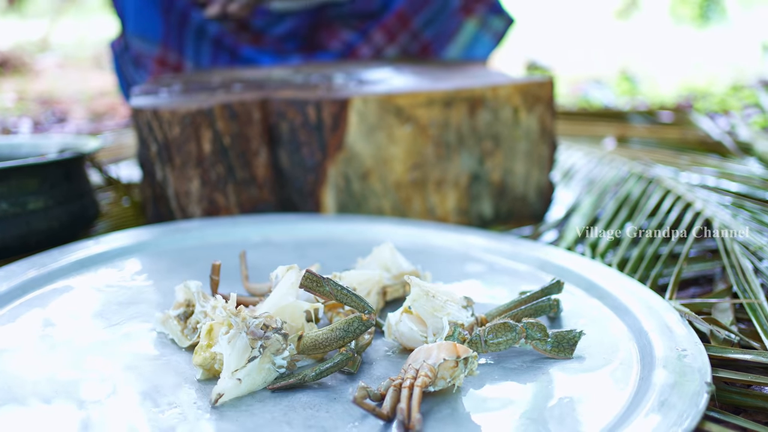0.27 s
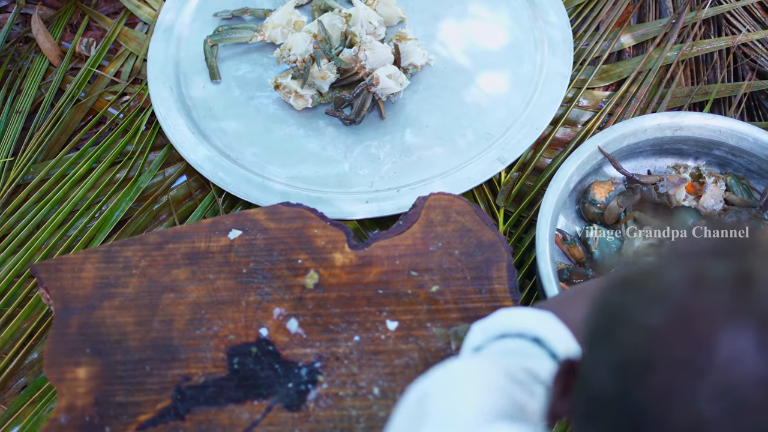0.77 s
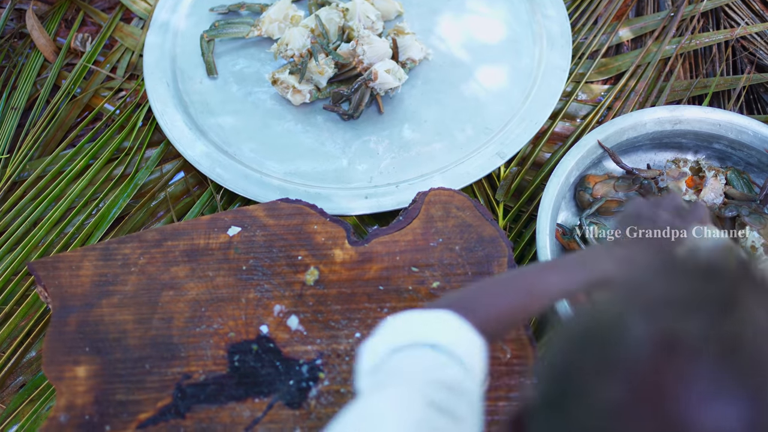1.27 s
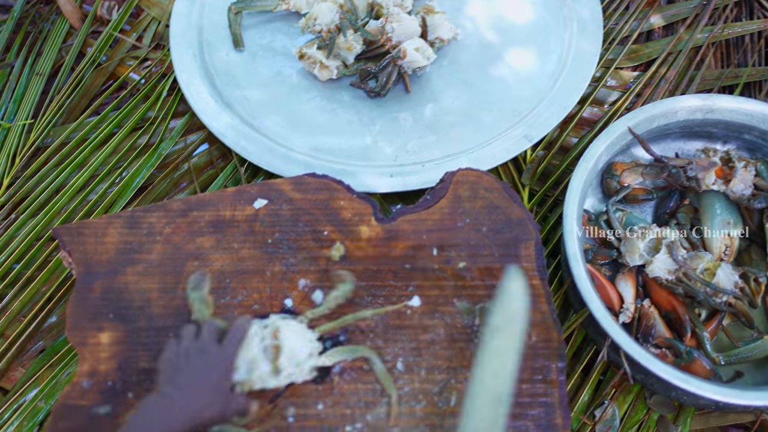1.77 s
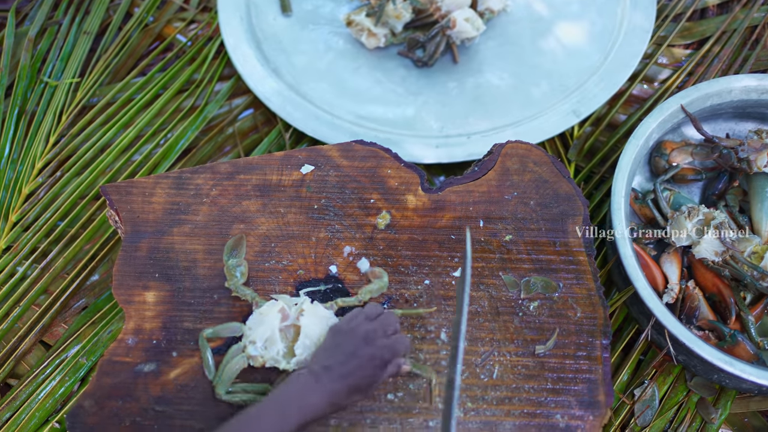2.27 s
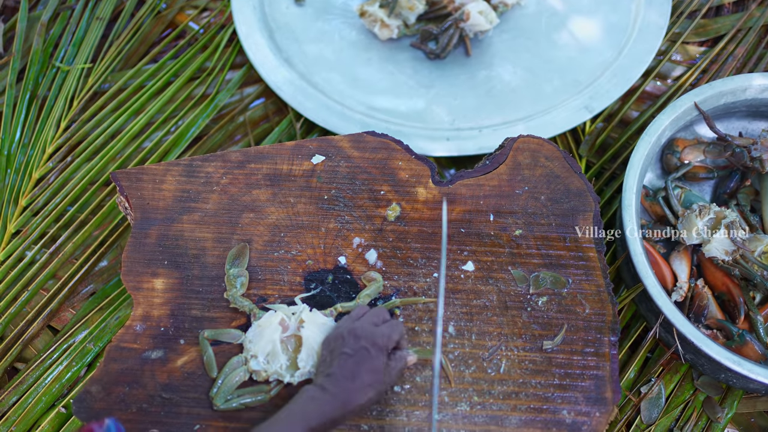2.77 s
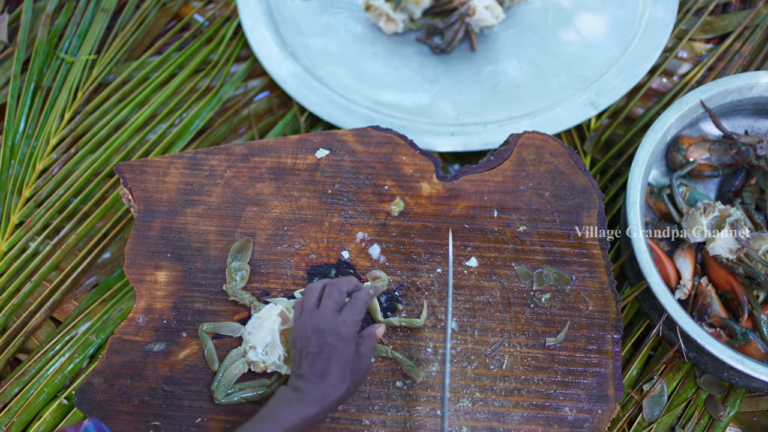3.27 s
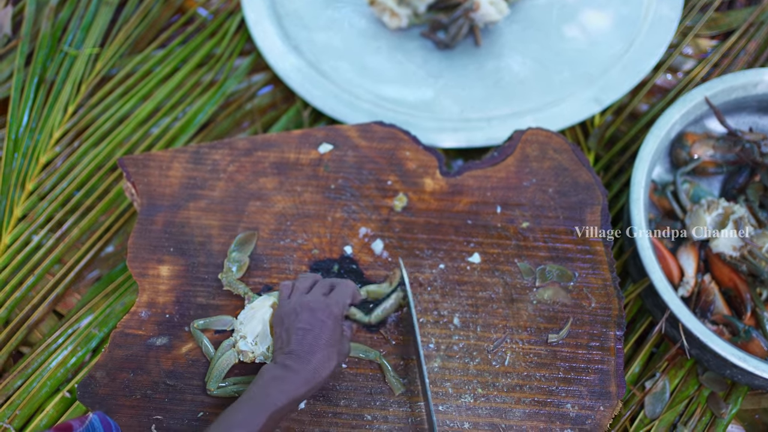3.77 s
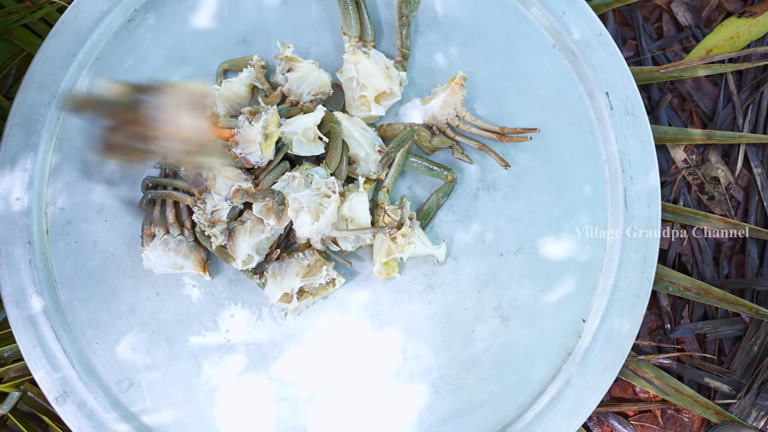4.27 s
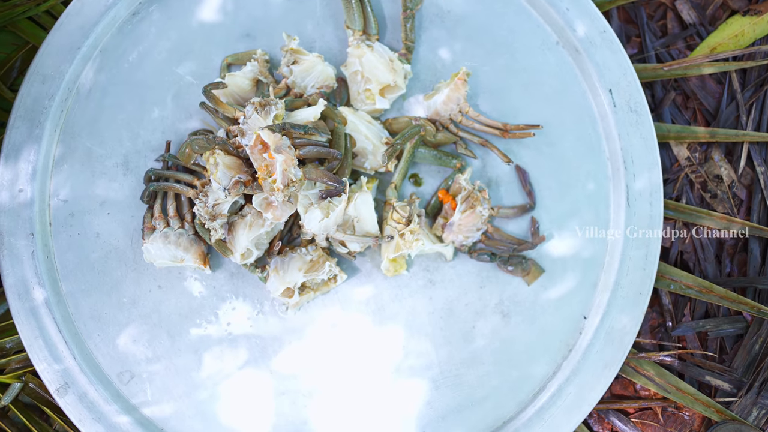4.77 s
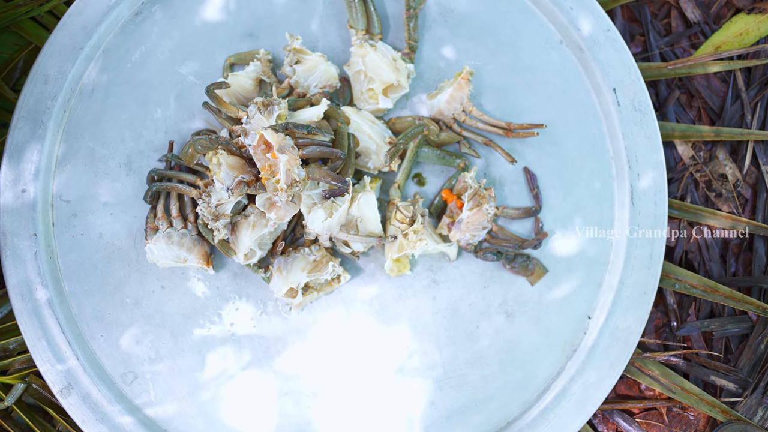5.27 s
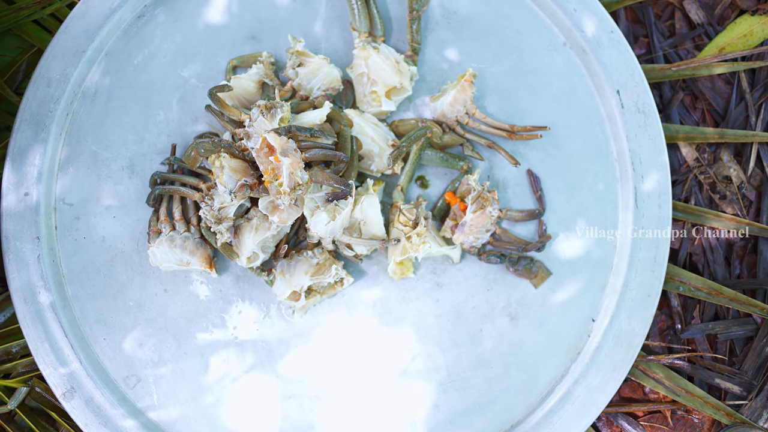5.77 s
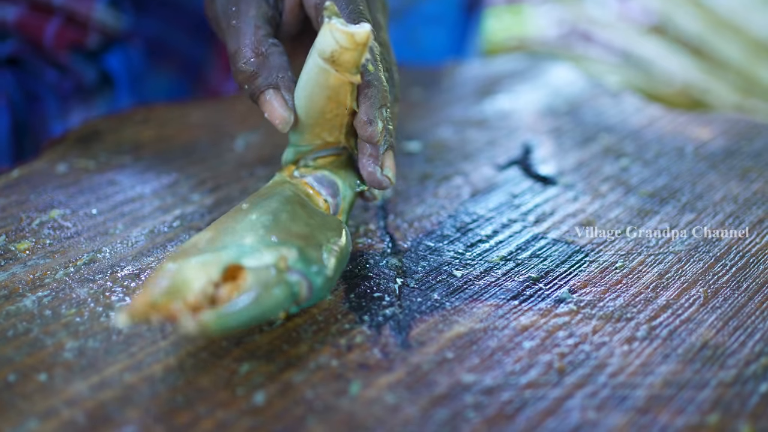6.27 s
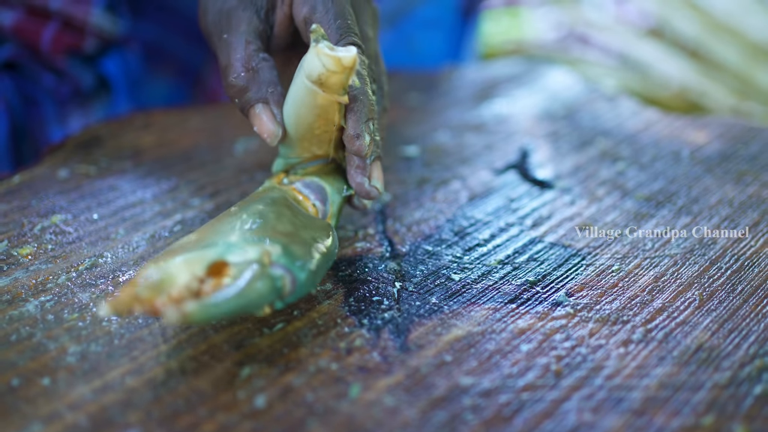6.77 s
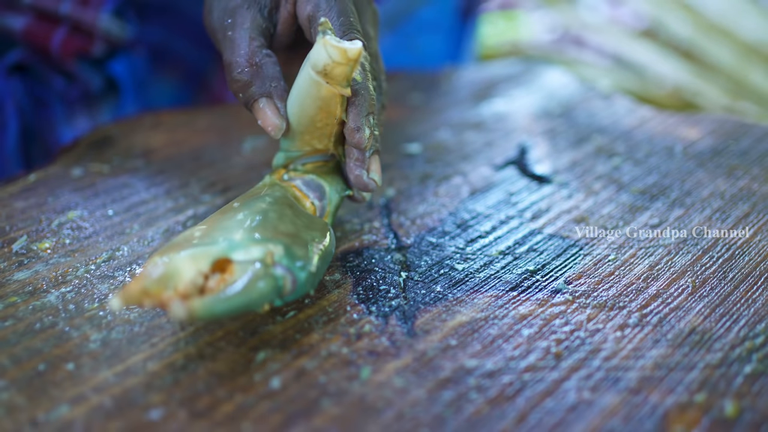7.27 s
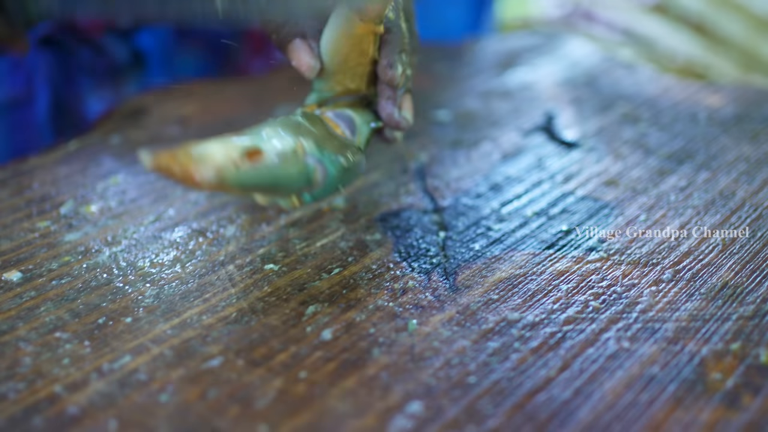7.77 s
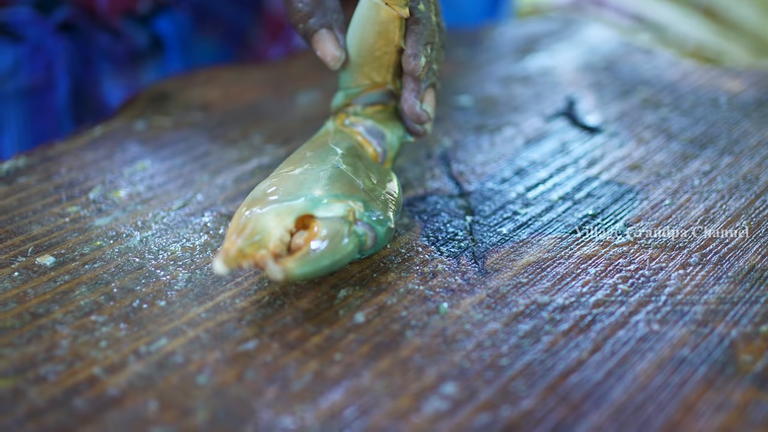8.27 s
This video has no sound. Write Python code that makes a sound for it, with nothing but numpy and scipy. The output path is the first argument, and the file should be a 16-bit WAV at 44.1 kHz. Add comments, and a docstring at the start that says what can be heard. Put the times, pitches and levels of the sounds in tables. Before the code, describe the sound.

Outdoors, wet crab shells crunch and clack, a cleaver chops into a wooden block, pieces clatter onto a tray, and wind buffets the microphone.

```python
"""Chopping crabs outdoors

A cook picks crabs from a metal bowl, chops them on a tree-stump block and tosses pieces onto a tray.
Struck things are damped tones with noise bursts, crunches are swarms of tiny cracks, glugs are sliding tones.
Each blow returns as a hiss from the palms around; filtered noise makes the rustling leaves and buffeting wind.
At 4.108 s the air and the returns abruptly change colour; the loudest peaks overload the microphone."""
import sys
import numpy as np
from scipy import signal
from scipy.fft import rfft, irfft
from scipy.io import wavfile
from scipy.ndimage import uniform_filter1d

SR = 44100
rng = np.random.default_rng(int(sys.argv[2]) if len(sys.argv) > 2 else 0)


def master_out(mix):
    """Clip the mix to full scale and print it as 16-bit PCM to the path in sys.argv[1]."""
    frames = np.transpose(np.atleast_2d(mix))
    ceiling = np.clip(frames, -1, 1)
    pcm = np.round(ceiling * 32767).astype(np.int16)
    wavfile.write(sys.argv[1], SR, pcm)


def ratio(d):
    """dB to gain"""
    e = np.asarray(d, float) / 20
    return 10 ** e


N = 376173
T = np.arange(N) / SR
AIR_SWITCH_S = 4.108  # air and returns change colour here
SHELL_STOP_S = 6.135  # the shell sounds stop dead here


def curve(rows, column, off=-90):
    """One column of a table joined by straight lines over time, at the level `off` outside it."""
    rows = np.array(rows)
    return np.interp(T, rows[:, 0], rows[:, column], left=off, right=off)


def colour(x, points):
    """Shape the spectrum by (pitch_hz, level_db) points, then set the rms to 1."""
    hz, db = np.transpose(points)
    f = np.arange(len(x) // 2 + 1) * SR / len(x) + 1
    gain = ratio(np.interp(np.log(f), np.log(hz), db))
    y = irfft(rfft(x) * gain, len(x))
    return y / np.sqrt(np.mean(y ** 2))


def band(x, low_hz, high_hz, order=2):
    """Keep one band of pitches, then set the rms to 1."""
    edges_hz = [low_hz, min(high_hz, .45 * SR)]
    y = signal.sosfilt(signal.butter(order, edges_hz, "band", fs=SR, output="sos"), x)
    return y / np.sqrt(np.mean(y ** 2))


def walk(rate, size=N):
    """Random levels held for 1 / rate seconds, then smoothed twice."""
    k = int(SR / rate)
    steps = np.repeat(rng.standard_normal(size // k + 1), k)
    return uniform_filter1d(uniform_filter1d(steps, k), k)[:size]


def ring(hz, t60, rise, size=4000):
    """A vibration that builds over about `rise` seconds and decays by 60 dB in `t60` seconds."""
    t = np.arange(size) / SR
    return np.sin(2 * np.pi * hz * t) * 1000 ** (-t / t60) * (1 - np.exp(-t / rise))


def add(out, s, x):
    """Mix x into out from time s."""
    i = int(s * SR)
    out[i:i + len(x)] += x[:N - i]


def boost(x, peaks):
    """Lift each resonance given as (pitch_hz, width_hz, boost_db)."""
    for hz, width, db in peaks:
        resonance = signal.lfilter(*signal.iirpeak(hz, hz / width, fs=SR), x)
        x = x + (ratio(db) - 1) * resonance
    return x


# colour of the open air before and after the switch: pitch_hz, relative level_db per Hz
AIR_COLOURS = [(65, -6), (110, 0), (327, -16), (823, -20), (1310, -16), (3350, -21.5), (6420, -23.5),
               (13400, -42), (16500, -73)], [(65, -33), (110, -4), (301, -14), (477, -16.5), (700, -15),
               (858, -6.5), (4310, -9.5), (9370, -18.5), (15200, -42.5)]
# loudness of the air before and after the switch: time_s, level_db
AIR_LEVELS = [(0, -47), (4.1, -47.5)], [(4.1, -45), (6.1, -42.5), (6.2, -41), (8.53, -40)]
# tones of a far motor: pitch_hz, average level_db
MOTOR_TONES = [(107.7, -48.5), (161.5, -51.5), (209.9, -54)]


def air():
    """Leaf hiss is coloured noise whose colour jumps; a far motor's wavering tones hum at the start."""
    before, after = (colour(rng.standard_normal(N), points) * ratio(curve(rows, 1))
                     for points, rows in zip(AIR_COLOURS, AIR_LEVELS))
    hum = np.zeros(N)
    for hz, db in MOTOR_TONES:
        level = np.sqrt(2) * ratio(db + 3.67 * walk(18.815))
        hum += level * np.sin(2 * np.pi * hz * T)
    return np.where(T < AIR_SWITCH_S, before, after) + hum * (T < .45)


# wind on the microphone: time_s, average buffet_db, average flutter_db
WIND_LEVELS = [(0.0, -51, -50), (0.45, -48.5, -53), (0.59, -22, -26.5), (0.92, -37, -59), (1.12, -24, -34),
               (1.64, -39.5, -52), (1.78, -37, -29.5), (1.99, -23, -56.5), (2.4, -27, -32.5),
               (2.83, -28.5, -43), (3.04, -45, -47), (3.18, -30, -38), (3.49, -41, -55),
               (4.16, -30.5, -42.5), (4.32, -42.5, -63.5), (7.89, -30, -37), (8.53, -39, -53.5)]
# dull low bumps, perhaps gusts flexing the windshield: start_s, level_db
BUMPS = [(0.594, -8), (1.076, -14), (1.238, -6.5), (1.739, -14.5), (2.389, -14), (2.964, -17.5),
         (3.132, -14), (3.328, -16.5), (6.689, -19), (7.279, -18), (7.82, -19), (8.04, -18.5)]


def wind():
    """Air pushing on the microphone: slow deep buffets, a faster flutter and lone ringing bumps."""
    buffet = band(rng.standard_normal(N), 7.37, 20.5, order=3)
    flutter = band(rng.standard_normal(N), 47.0, 69.2)
    out = ratio(curve(WIND_LEVELS, 1) + 5.6 * walk(10.0)) * buffet
    out += ratio(curve(WIND_LEVELS, 2) + walk(5.4)) * flutter
    for s, db in BUMPS:
        add(out, s, ratio(db) * ring(61.6, 0.16, 0.01, size=20000))
    return out


# air pockets in the wet bowl as a crab comes free:
# start_s, length_s, average first_pitch_hz, average last_pitch_hz, average level_db
AIR_POCKETS = [(1.219, 0.046, 431.5, 223, -14.5), (1.277, 0.024, 289, 340, -26),
               (1.307, 0.015, 391.3, 385, -22.5)]


def glug():
    """Each air pocket swells and fades unevenly while its trembling pitch slides with its size."""
    out = np.zeros(N)
    for s, length, first_hz, last_hz, db in AIR_POCKETS:
        u = np.linspace(0, 1, int(length * SR))
        level = ratio(db + 2.5 * walk(200, size=len(u))) * np.sin(np.pi * u) ** 0.82
        hz = (first_hz + (last_hz - first_hz) * u) * (1 + .05 * walk(250, size=len(u)))
        add(out, s, level * np.sin(2 * np.pi * np.cumsum(hz) / SR))
    return out


# shells sliding and crunching:
# start_s, hold_s, average body_db, average treble_db, pitch_hz of the commonest fragments
CRUNCHES = [(0, .04, -24, -34.5, 1333), (0.62, 0.26, -49.5, -50, 5730), (0.623, 0.03761, -39.5, -45, 1320),
            (0.704, 0.031, -35.5, -47, 1618), (0.748, 0.05, -42, -40.5, 4000),
            (0.958, 0.05535, -36.5, -44.5, 2720), (1.038, 0.057, -27.5, -32, 3585),
            (1.107, 0.022, -31, -31.5, 1900), (1.145, 0.039, -37, -41.5, 3660),
            (1.188, 0.016, -32.5, -42.5, 1900), (1.226, 0.0768, -42.5, -66, 2060),
            (4.38, 0.014, -27, -25, 3193), (4.403, 0.039, -28, -37, 1554),
            (4.512, 0.022634, -40.5, -40, 2870), (4.607, 0.059, -31, -34.5, 1190),
            (4.711, 0.007, -31, -32.5, 2570), (4.794, 0.028483, -35.5, -45.5, 1200),
            (5.721, 0.07, -40, -48, 613), (5.81, 0.015, -29, -49, 675.8), (5.861, 0.048, -34.5, -61.5, 670),
            (6.001, 0.084, -26, -32, 2472), (6.074, 0.045, -22, -31.5, 1090)]


def crunch_levels():
    """Body level, treble level and pitch: crunches rise fast, hold, die away; the loudest sets the pitch."""
    rise_db_per_s, fall_db_per_s = 3000, 600
    levels_db, common_hz = np.full((2, N), -90.), np.ones(N)
    for s, hold, *db, hz in CRUNCHES:
        rise = rise_db_per_s * np.minimum(T - s, 0)
        fall = fall_db_per_s * np.maximum(T - s - hold, 0)
        slope = rise - fall
        common_hz[max(db) + slope > levels_db.max(axis=0)] = hz
        levels_db = np.maximum(levels_db, np.array(db)[:, None] + slope)
    return *levels_db, common_hz


# colour of the crunching fragments: pitch_hz, relative level_db per Hz
GRIT_COLOUR = [(200, -10.5), (426, 9), (799, 5.5), (2370, -4), (8970, -18.5), (15300, -42)]


def scrape():
    """Dense uneven tiny cracks; each size of fragment rings its own pitch and comes and goes by itself."""
    favour_db, favour_octaves = 7, 0.18  # how far the commonest fragments stand out, and how alike they are
    body_db, treble_db, common_hz = crunch_levels()
    on = body_db > -75  # work only where a crunch can be heard
    n, (grit_hz, grit_db) = on.sum(), np.transpose(GRIT_COLOUR)
    parts, power = np.zeros((2, 2, n))  # body and treble
    # cracks that ring every size at once, about 160 a second
    together = (rng.random(n) < 160 / SR) * ratio(6.5 + 3.4 * rng.standard_normal(n))
    for hz in 300 * 2 ** (np.arange(23) / 4):
        chance = rng.random((3, n))
        happens = chance[0] < 450 / SR
        sign = np.sign(chance[1] - .5)
        hits = together + happens * sign * ratio(-3.5 * np.log(chance[2] + 0.0041))
        # a band is as wide as its pitch, so dB per Hz becomes dB per band
        db = np.interp(np.log(hz), np.log(grit_hz), grit_db) + 10 * np.log10(hz)
        db = db + favour_db * np.exp(-(np.log2(hz / common_hz[on]) / favour_octaves) ** 2)
        part = int(hz > 2700)
        power[part] += ratio(2 * db)
        parts[part] += ratio(db + 4.7 * walk(21.83, size=n)) * band(hits, 0.934 * hz, 1.061 * hz)
    parts = parts / np.sqrt(power)
    out = np.zeros(N)
    jolts = ratio(2.4 * walk(140, size=n))
    out[on] = jolts * (ratio(body_db[on]) * parts[0] + ratio(treble_db[on]) * parts[1])
    return out


def snap(db, hz, cycles, rough_cycles=4.1, rough_db=-3):
    """A tick, brighter for harder blows, and the snap of the shell with rough edges."""
    t = np.arange(4000) / SR
    chance = rng.standard_normal((2, len(t)))
    tick = band(chance[0], 2000, 8600) * np.exp(-t / 0.0017)
    rough = band(chance[1], 0.37 * hz, 1.25 * hz)
    rough = rough * np.exp(-t * hz / (0.5 * cycles + rough_cycles)) * (1 - np.exp(-2 * t * hz))
    rough = ratio(rough_db) * 3 / (cycles + 6) * rough
    return ratio(db) * (ring(hz, cycles / hz, 0.27 / hz) + rough + ratio(0.063 * db - 24.5) * tick)


def hollow(db, hz):
    """The shell's cavity: a hollow ring beating with its neighbour mode."""
    return ratio(db) * (ring(hz, 15 / hz, 0.0015) + 0.29 * ring(1.23 * hz, 13 / hz, 0.00248))


# vibrations of the tray: pitch_hz, average relative level_db, decay_s to fall by 60 dB
TRAY_MODES = [(257, -18, 0.13), (310, -1, 0.042), (385, -5, 0.0266)]


def tray(db):
    """Every landing spot shares the blow differently among the tray's modes."""
    return sum(ratio(db + mode_db + 3.8 * rng.standard_normal()) * ring(hz, t60, 0.0025)
               for hz, mode_db, t60 in TRAY_MODES)


# hollow shells knocking together or on the block: start_s, snap_db, snap_hz, hollow_db, hollow_hz
SHELL_KNOCKS = [(0.02, -7.5, 1320, -11, 639.5), (0.475, -28, 930, -18.5, 410), (0.493, -21, 920, -9, 610),
                (0.819, -23.5, 820, -22, 760), (0.942, -40, 910, -14.5, 440),
                (1.033, -8.5, 919.2, -3, 636.2), (1.04, -24, 886, -5.5, 428), (1.065, -5, 953.6, -1.5, 680),
                (1.091, -9, 3593, -12, 463), (1.108, -9.5, 1900, -27, 480.3),
                (1.203, -11.5, 1402, -19, 454.6), (1.271, -23, 758, -10, 331.5),
                (1.819, -2.5, 2430, -23.5, 248), (5.723, -16, 949, -27, 620.5),
                (5.981, -14, 1578, -19, 732.4), (6.004, -14, 1090, -14, 458.8),
                (6.027, -6, 4000, -20, 438.5), (6.04, 4, 2550, -10.5, 373.6), (6.096, 5.5, 2630, -24, 500),
                (6.101, -5, 1304, -7.5, 417), (6.107, -11, 955, -5, 610), (8.163, -25, 2011, -26, 356)]
# pieces bouncing on the tray: start_s, snap_db, snap_hz, tray_db
TRAY_BOUNCES = [(4.385, 11, 3060, -16), (4.402, -12.5, 921, -3), (4.415, -5, 1202, -7.5),
                (4.437, 1.5, 3470, -10), (4.455, -7, 1591, -2.5), (4.519, -15, 934, -15.5),
                (4.607, 3.5, 590, -8), (4.622, 0.5, 729, -12.5), (4.634, -0.5, 1540, -5.5),
                (4.649, -8, 600, -20), (4.654, 4, 765, -15.5), (4.686, 1.5, 710, 1.5), (4.698, -8, 1703, 1),
                (4.716, -6, 1853, -7.5), (4.798, -5, 980, -27.5)]
# thin legs and splinters clicking, and the short 1 kHz ring of one cleaver blow at 3.737 s: start_s, level_db,
# pitch_hz, ring length in cycles
LEG_CLICKS = [(0.025, -19.5, 3730, 15), (0.632, -25, 1290, 14.2), (0.72, -22.5, 1010, 9.65),
              (0.761, -15.5, 3840, 39), (0.857, -19, 1694, 7.3), (0.899, -21, 2980, 8.15),
              (0.975, -17, 1170, 7.6), (1.119, -14, 1740, 16), (1.129, -24, 4000, 23),
              (1.584, -23, 11220, 8.5), (1.641, -34.5, 1970, 57), (1.82, -13.5, 1040, 12),
              (2.654, -20.5, 9545, 9.8), (3.316, 1, 2070, 15), (3.326, -2, 1960, 10.5),
              (3.317, -19, 980, 43), (3.335, -14, 2400, 14), (3.395, -16.5, 1741, 25.73),
              (3.406, -15.5, 1561, 7.1), (3.737, -3.5, 1025, 16), (3.865, -31, 1860, 140),
              (3.886, -31, 1843, 136.6), (3.902, -28, 1863, 92), (4.381, 0.5, 3410, 15),
              (4.394, -6, 2813, 16), (4.397, -9, 3300, 11), (4.542, -10, 1205, 16.5),
              (5.867, -2, 1721, 6.6), (6.041, -11, 5902, 55), (6.098, -24, 5800, 25),
              (7.897, -12.5, 3300, 18)]


def knocks():
    """Knocks ring the shell's own cavity, bounces ring the tray, clicks are dry."""
    out = np.zeros(N)
    for s, snap_db, snap_hz, hollow_db, hollow_hz in SHELL_KNOCKS:
        add(out, s, snap(snap_db, snap_hz, cycles=7.2) + hollow(hollow_db, hollow_hz))
    for s, snap_db, snap_hz, tray_db in TRAY_BOUNCES:
        add(out, s, snap(snap_db, snap_hz, cycles=5.4, rough_db=-8.5) + tray(tray_db))
    for s, db, hz, cycles in LEG_CLICKS:
        add(out, s, snap(db, hz, cycles, rough_cycles=4.2))
    return out


# a piece dropping back on the block: start_s, snap_db, snap_hz, block_db, block_hz
BLOCK_DROPS = [(3.011, -14, 1750, -5, 450), (3.752, -16, 1000, -7, 480), (6.679, -10, 1240, -6.5, 360),
               (7.24, 4, 1010, -21, 470), (7.245, -1, 780, -18, 479.1), (7.868, 11, 1000, 4, 590),
               (7.871, -3.5, 890, -14, 606)]


def drops():
    """Solid wood under the claw: a short snap and a dead thud."""
    out = np.zeros(N)
    for s, snap_db, snap_hz, block_db, block_hz in BLOCK_DROPS:
        thud = ratio(block_db) * ring(block_hz, 4.5 / block_hz, 0.0013)
        add(out, s, snap(snap_db, snap_hz, cycles=4.2, rough_cycles=1.0, rough_db=-13) + thud)
    return out


def patchy(x, patch_db, rate):
    """Each half octave swells and fades by itself."""
    spectrum = rfft(x)
    octave = np.log2(np.arange(len(x) // 2 + 1) * SR / len(x) + 1)
    out = np.zeros(len(x))
    for centre in np.arange(6.5, 15, .5):
        share = np.clip(1 - 2 * np.abs(octave - centre), 0, 1)
        out += ratio(patch_db * walk(rate, size=len(x))) * irfft(spectrum * share, len(x))
    return out


# cleaver through shell into wood:
# start_s, level_db of the whole blow, then within it shell_db, shell_hz, thud_db, thud_hz, echo_db
CLEAVER_BLOWS = [(2.988, -6, -1.5, 1720, 1, 378, -19), (3.735, -9.5, -19, 2200, 8, 428, -17.5),
                 (6.4336, -6.5, -2, 2030, -31, 900, -10), (7.128, -2, -12, 3140, 3.5, 900, -14.5),
                 (7.695, -3.5, -4, 3280, 1, 706, -17.5)]
# ring of the blade: pitch_hz, level_db within the blow, decay_s to fall by 60 dB
BLADE_MODES = [(3680, -34, .12), (4480, -29, .25), (7740, -30, .15)]
# colour of the returns before and after the switch: pitch_hz, relative level_db per Hz
ECHO_COLOURS = ([(120, -17), (200, -1.5), (664, -13), (979, -7), (4530, -9), (12500, -25), (15600, -40.5)],
                 [(180, -59), (300, -19), (1210, -7.5), (1800, -2.5), (4390, 4.5), (10900, -13),
                 (15700, -29)])
# resonances of block and blade that colour the returns: pitch_hz, width_hz, boost_db
ECHO_RESONANCES = [(1010, 75, 5.5), (1900, 270, 5), (3636, 100, 6), (4450, 90, 2.5), (7500, 910, 7)]
# delay at which the far returns are thickest, before and after the switch: delay_s
ECHO_PEAKS = 0.033, 0.053


def cleaver():
    """A splintering burst, the stump's thud, the blade's ring, and returns scattered by trunks and fronds."""
    crack_s, through_s = 0.0035, 0.00232  # the blade meets shell first and wood `through_s` later
    low_echo_hz, low_echo_late = 2640, 0.28  # delay of deep far returns, as a share of the peak delay
    out, t = np.zeros(N), np.arange(SR // 2) / SR
    for s, db, shell_db, shell_hz, thud_db, thud_hz, echo_db in CLEAVER_BLOWS:
        chance = rng.standard_normal((2, len(t)))
        after = int(s > AIR_SWITCH_S)
        crack = ratio(shell_db) * band(chance[0], 0.83 * shell_hz, 1.1 * shell_hz)
        crack += band(chance[0], 760, 4530) + ratio(-9.5) * band(chance[0], 5200, 8900)
        crack = crack * np.exp(-(t / crack_s) ** 3)
        thud = np.roll(ring(thud_hz, 7 / thud_hz, 0.00035, size=len(t)), int(through_s * SR))
        blade = sum(ratio(mode_db) * ring(mode_hz, t60, 0.000651, size=len(t))
                    for mode_hz, mode_db, t60 in BLADE_MODES)
        # near returns fade at once; far ones swell, then fade
        near = 4.07 * np.exp(-t / 0.003)
        late = t / ECHO_PEAKS[after]
        far = 0.41 * (late * np.exp(1 - late)) ** 2.03
        far += (0.15, 0.13)[after] * (1 - np.exp(-late)) * np.exp(-t / 0.13)
        # each return is a separate patch of foliage, so the hiss is lumpy
        hiss = boost(colour(chance[1], ECHO_COLOURS[after]), ECHO_RESONANCES)
        hiss = patchy(hiss, patch_db=3.0, rate=69.4)
        # deeper far returns come only from far trunks, so they start later
        low = signal.sosfilt(signal.butter(2, low_echo_hz, fs=SR, output="sos"), hiss)
        echo = hiss * (near + far) - low * far * np.exp(-(late / low_echo_late) ** 3)
        add(out, s, ratio(db) * (crack + blade + ratio(thud_db) * thud + ratio(echo_db) * echo))
    return out


def scene():
    """Shell sounds scatter faintly from the ground and are silent for 0.2 s from their sudden stop."""
    shells = knocks() + scrape() + glug()
    t = np.arange(SR // 8) / SR
    scatter = band(rng.standard_normal(len(t)), 230.0, 16500) * np.exp(-t / 0.043) * ratio(-43.0)
    shells = shells + signal.fftconvolve(shells, scatter)[:N]
    shells = shells * ((T < SHELL_STOP_S) | (T > SHELL_STOP_S + .2))
    # small things radiate no deep bass
    bass_cut = signal.butter(3, 170, "high", fs=SR, output="sos")
    near = signal.sosfilt(bass_cut, shells + cleaver() + drops())
    return (near + wind() + air())[None]


def band_limit(x):
    """A steep low-pass at the top of the band."""
    return signal.sosfilt(signal.butter(12, 16830, fs=SR, output="sos"), x)


# resonances of the microphone housing: pitch_hz, width_hz, boost_db
HOUSING = [(1960, 97, 4), (4070, 450, 1.5), (6140, 330, 1.5)]
# highest level the input lets through, before and after the shells stop: amplitude
CEILINGS = .6, .7


def record(dry):
    """The housing colours everything; the input stage flattens the loudest peaks."""
    dry = boost(dry, HOUSING)
    top = np.where(T < SHELL_STOP_S, *CEILINGS)
    flattened = dry / (1 + np.abs(dry / top) ** 6) ** (1 / 6)
    return band_limit(flattened)


dry = scene()
out = record(dry)
master_out(out)
```